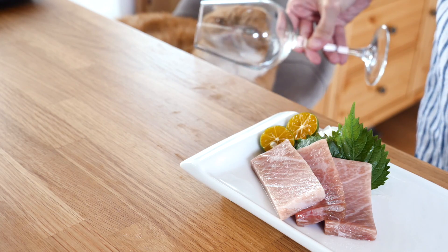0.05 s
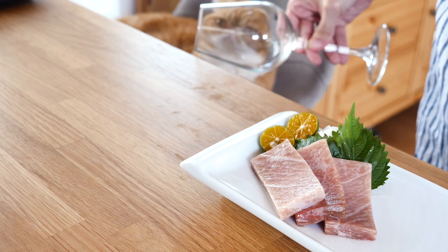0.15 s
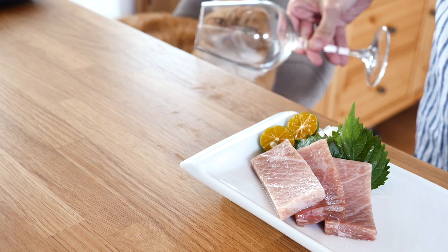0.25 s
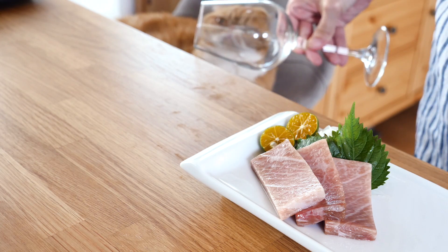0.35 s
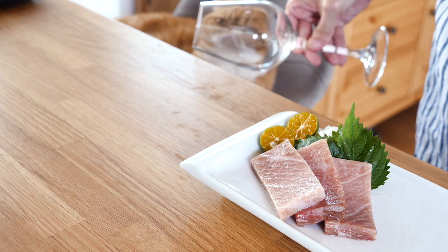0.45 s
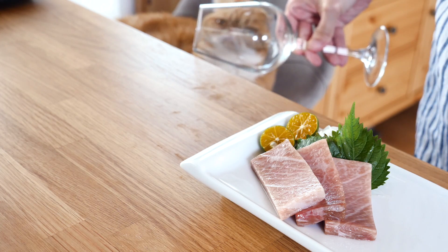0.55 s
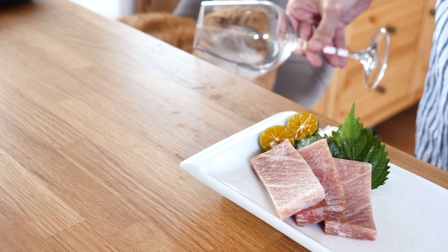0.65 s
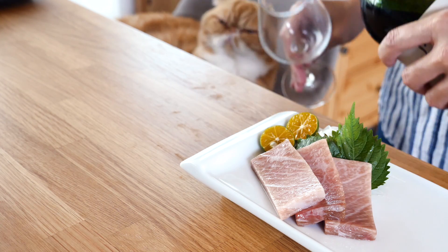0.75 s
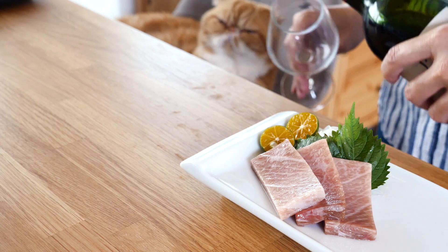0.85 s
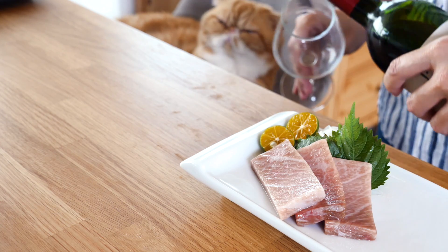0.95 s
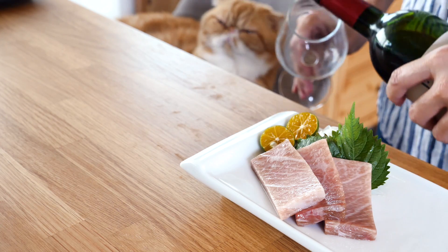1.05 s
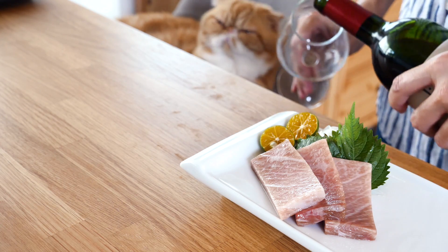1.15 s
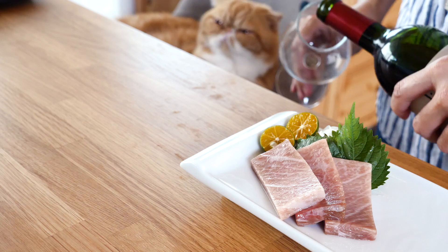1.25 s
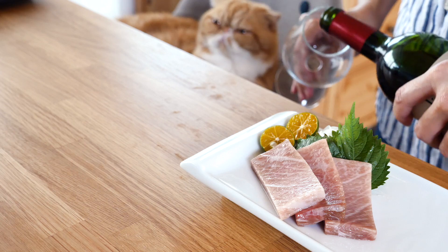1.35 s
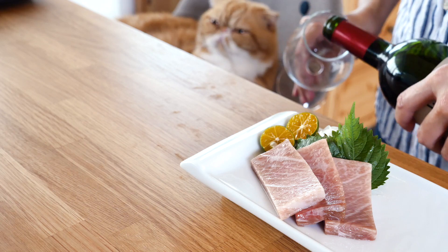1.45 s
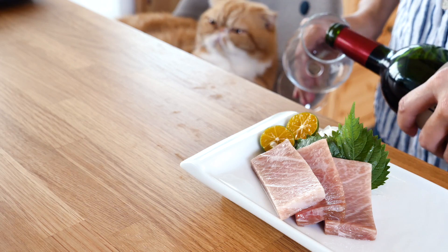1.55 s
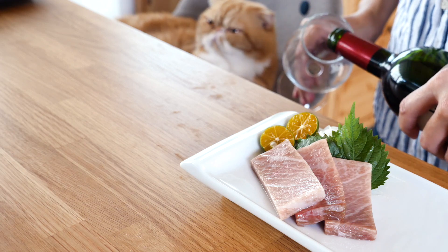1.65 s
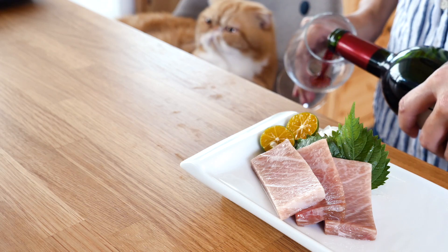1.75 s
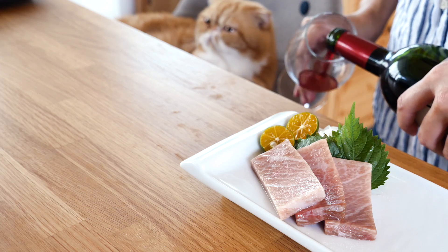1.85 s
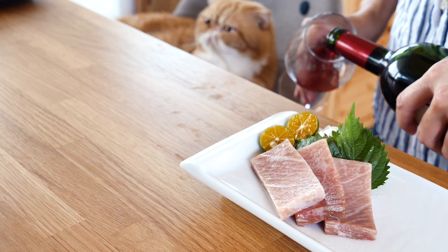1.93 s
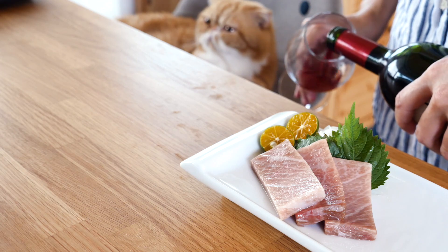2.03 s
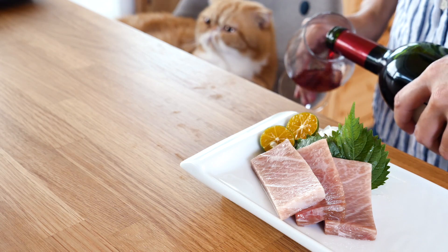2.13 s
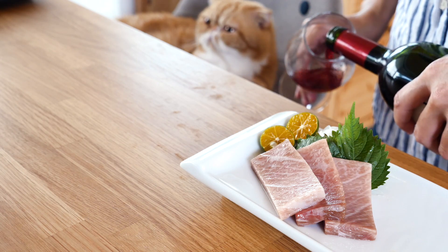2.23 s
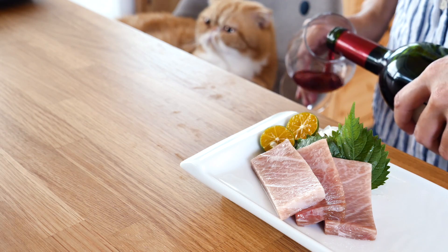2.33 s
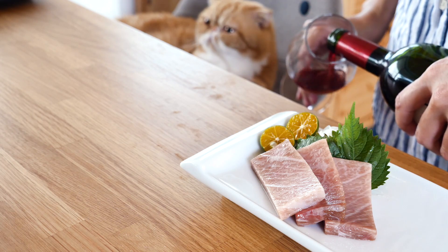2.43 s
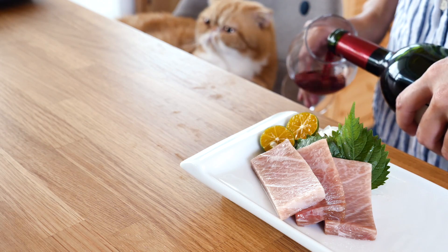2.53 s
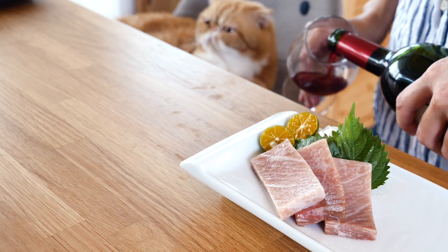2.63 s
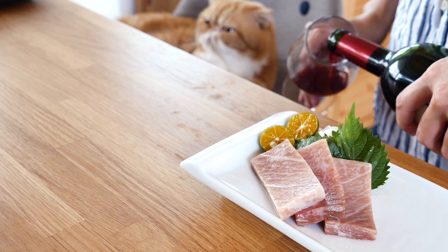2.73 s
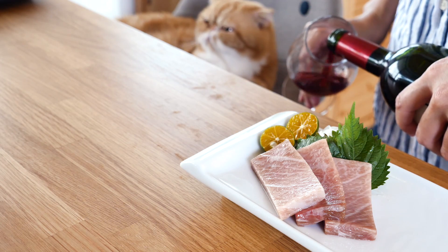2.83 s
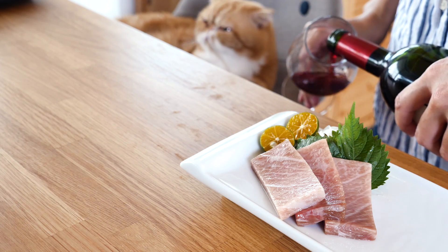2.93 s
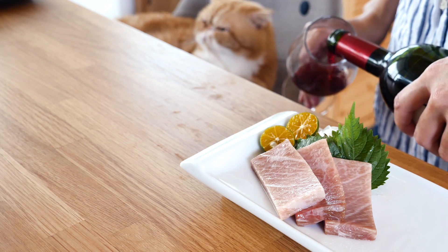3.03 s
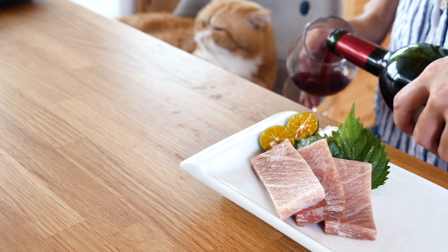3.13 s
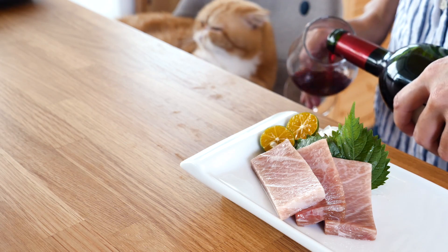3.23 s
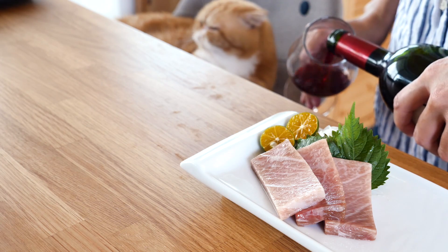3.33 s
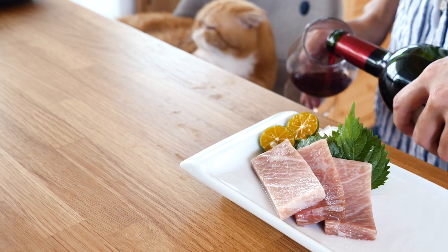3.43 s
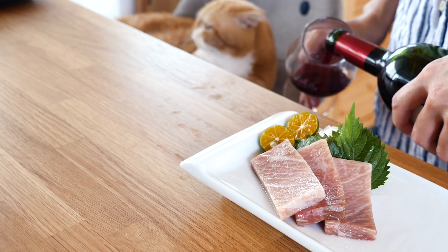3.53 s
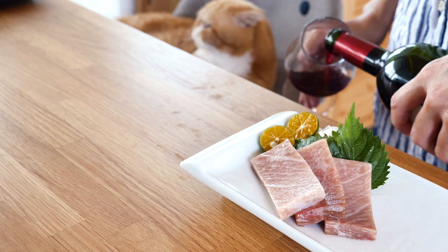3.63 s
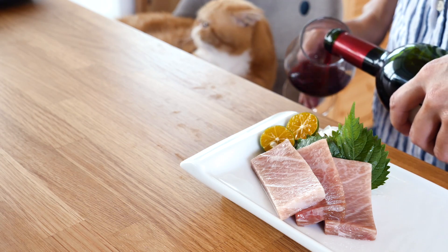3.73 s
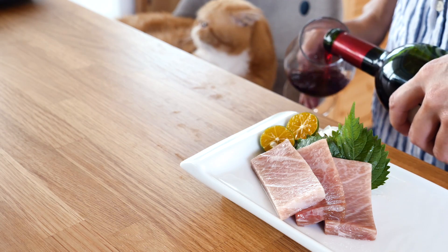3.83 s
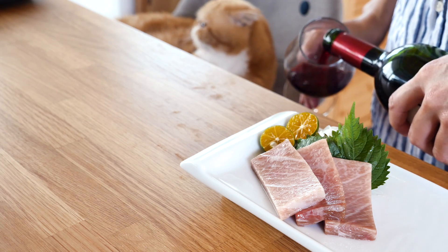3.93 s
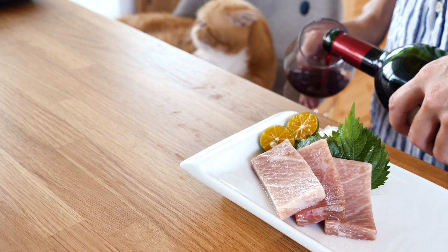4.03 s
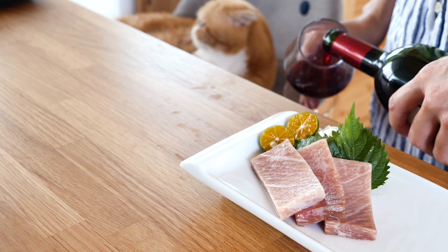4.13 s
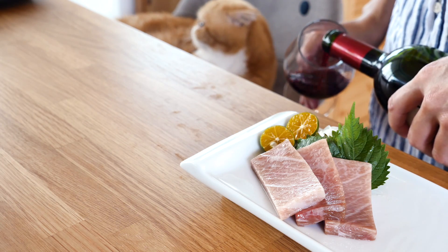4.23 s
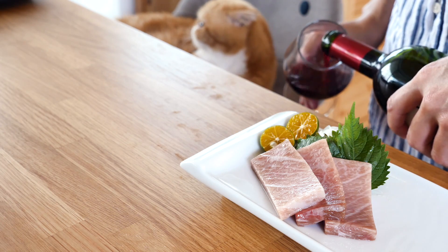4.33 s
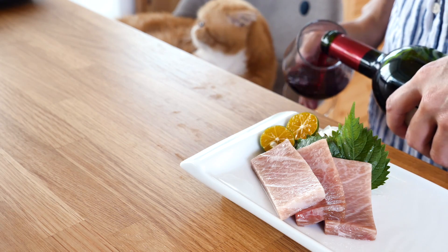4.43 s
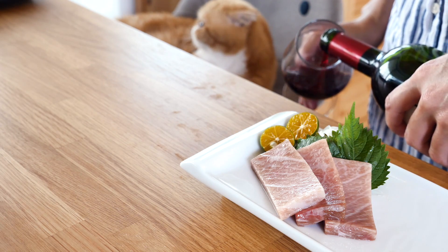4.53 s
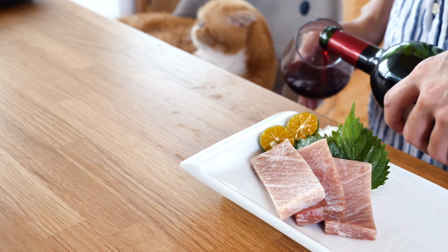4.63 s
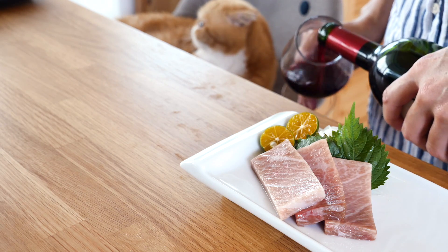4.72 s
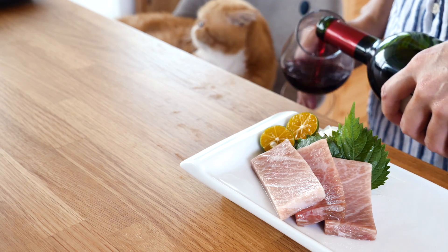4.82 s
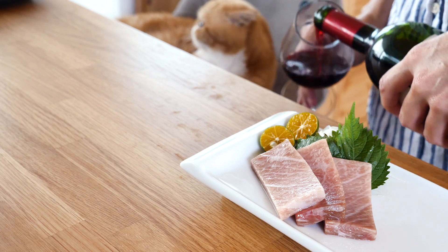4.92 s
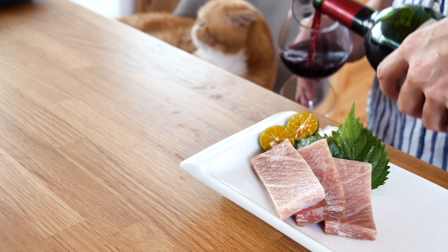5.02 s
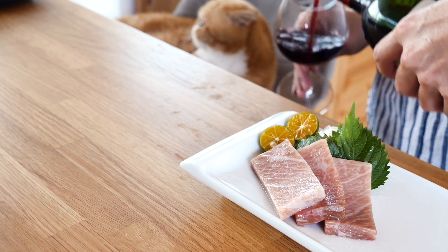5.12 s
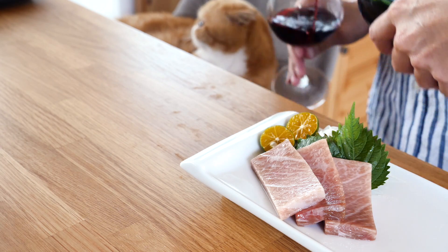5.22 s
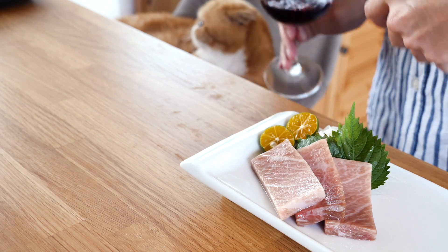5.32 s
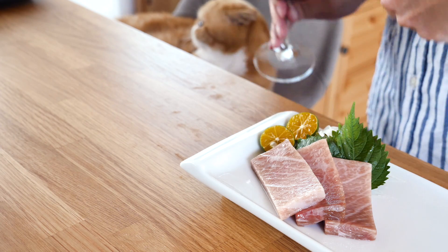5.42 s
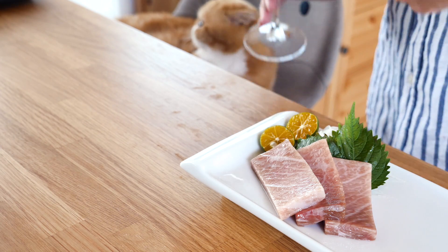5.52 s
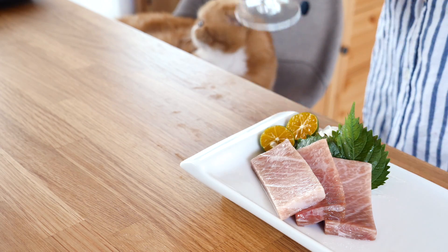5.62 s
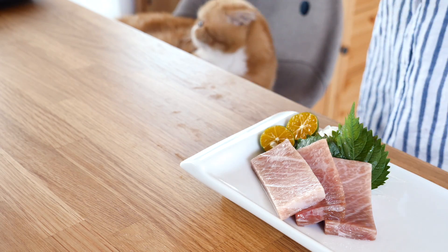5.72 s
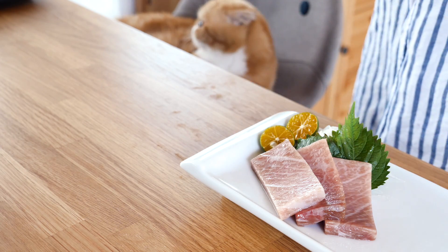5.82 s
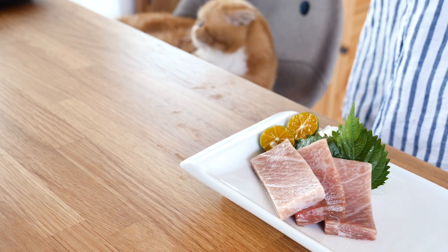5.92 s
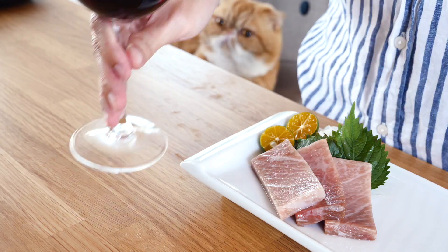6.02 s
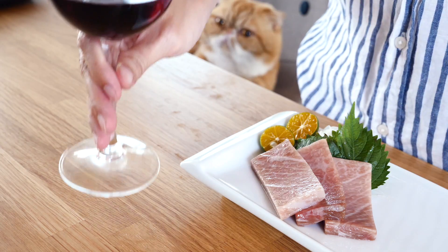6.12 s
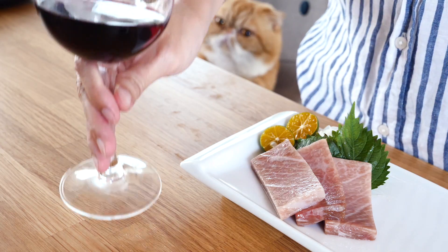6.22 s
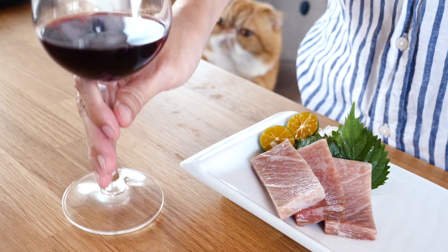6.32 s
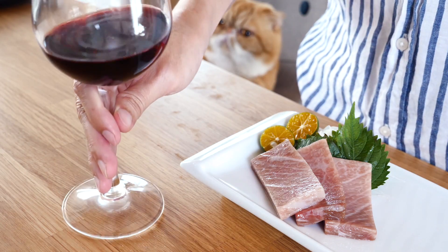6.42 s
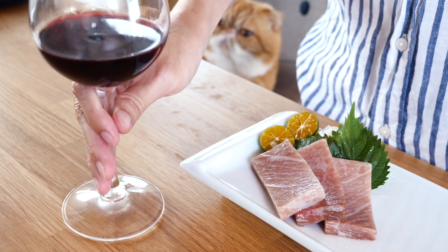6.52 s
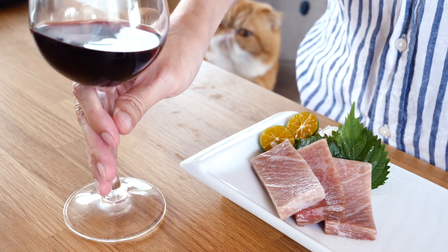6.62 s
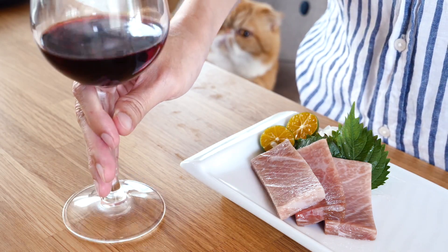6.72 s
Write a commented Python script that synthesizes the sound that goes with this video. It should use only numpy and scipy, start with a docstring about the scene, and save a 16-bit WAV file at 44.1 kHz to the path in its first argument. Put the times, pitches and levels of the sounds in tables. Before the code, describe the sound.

Low, smooth air noise runs throughout. After a quiet opening comes one clear, wavering glass clink, then a delicate sparse trickle of wine into the bowl, with ticking splashes and little rising bubble blips. The pour ends with a short hard tap, a louder bubble and low glugs. After a pause, the glass foot strikes wood, the loudest event, and rattles softly to rest. Close microphone, short dull reflections of a small room.

```python
"""Wine is poured in a thin stream into a hand-held glass: splashes are short noise snaps that ring the bowl,
bubbles are dying sines of climbing pitch, and stray droplets are faint short tones. Before the pour the bottle
neck clinks on the rim, and it taps again as it is lifted away; both are sums of dying modes and noise puffs.
Last, the glass is set on a wooden table where its foot rocks to rest, again as modes and noise.
A small quiet room adds dying noise echoes; shaped noise makes the steady rush of ventilation."""
import sys
import numpy as np
from scipy import signal
from scipy.fft import rfft, irfft
from scipy.io import wavfile

SR = 44100
rng = np.random.default_rng(int(sys.argv[2]) if len(sys.argv) > 2 else 0)


def to_wav(sig):
    """Store sig (one row per channel, or 1-D mono) as 16-bit WAV at the path in sys.argv[1].

    Samples outside -1..1 are clipped; the rate is SR.
    """
    pcm = np.clip(np.atleast_2d(sig), -1, 1) * 32767
    pcm = np.round(pcm).astype(np.int16)
    wavfile.write(sys.argv[1], SR, pcm.T)  # frames by channels


N = 298380   # length of the scene in samples
TIME = np.arange(SR // 2) / SR   # the half second, in s, that each single sound may last


def amp(db):
    """Turn decibels into a factor of amplitude."""
    return 10 ** (np.asarray(db) / 20)


def add(out, start_s, sound):
    """Mix a sound in from its start time."""
    at = round(start_s * SR)
    out[at:at + len(sound)] += sound[:N - at]


def fade(t60_s):
    """An even dying away: 60 dB down after t60_s, which is never under 4 ms."""
    return amp(-60 * TIME / max(t60_s, .004))


def swell(rise_s):
    """The moment that a contact lasts: a smooth rise to 1."""
    return 1 - np.exp(-(TIME / rise_s) ** 2)


def tone(pitch_hz, t60_s):
    """A struck mode: a dying sine of height 1."""
    return fade(t60_s) * np.sin(2 * np.pi * pitch_hz * TIME)


def burst(low_hz, high_hz, t60_s):
    """A dying puff of band noise, starting at rms 1."""
    band = signal.butter(2, [low_hz, min(high_hz, .45 * SR)], "band", fs=SR, output="sos")
    noise = signal.sosfilt(band, rng.standard_normal(len(TIME)))
    return fade(t60_s) * noise / noise.std()


def splashes():
    """Each splash snaps in its own band, rings the nearby modes of the filled bowl and throws droplets."""
    # clear splashes on the wall of the glass: start_s, level_db, centre_hz
    clear = [(2.2518, -37.5, 6460), (2.2522, -47, 13400), (2.8416, -58, 11100), (3.2353, -58, 13700),
             (3.2705, -49, 5370), (3.282, -53, 13500), (3.437, -43.5, 4600), (3.5341, -47, 5030),
             (3.5345, -48, 13500), (3.5785, -61, 13000), (3.8419, -55, 8300), (3.9387, -45, 10800),
             (4, -48, 9300), (4.0469, -58, 13000), (4.067, -44, 12700), (4.1068, -58, 10900),
             (4.3213, -45.5, 9900), (4.336, -47, 9700), (4.355, -55, 10000), (4.4006, -55, 7700),
             (4.5413, -55, 9900), (4.5872, -52, 13200), (4.6026, -47, 11400), (4.6241, -49, 12600),
             (4.648, -50.5, 8050), (4.881, -58, 11500), (4.9099, -44, 5560), (4.9414, -47, 6540),
             (4.9638, -59, 10500), (4.9723, -44.5, 6940), (4.9868, -53, 11500), (5.0347, -54, 9150),
             (5.0721, -47.5, 13100), (5.1775, -35, 7300), (5.2153, -40.5, 7300), (5.2452, -49, 9600),
             (5.2756, -38.5, 6880), (5.2856, -49, 9200), (5.3105, -38, 8040), (5.34, -54, 12400),
             (5.365, -54, 11900)]
    # the filled bowl, damped by wine and hand: pitch_hz, level_db, t60_s
    filled_bowl = [(5329, 3.5, .2), (6200, -13, .06), (7140, 5.5, 0.1), (8231, -2, .08), (9600, -6, .08),
                   (9800, 7, 0.11), (11000, -12, .06), (11913, -3, 0.088), (12478, -3, .06),
                   (12796, 5, 0.05), (14000, 2, .04), (14600, -3, .04), (15267, 2, .04)]
    snap_width_hz, snap_t60_s, skirt_db, ring_db = 1700, .015, -16, -4
    spray_mean_delay_s, spray_db = .02, -10.5
    # faint splashes fall anywhere between these corners: start_s, level_db, centre_hz
    low, high = np.array([2.6, -60, 8350]), np.array([5.85, -57.5, 14500])
    faint = low + (high - low) * rng.random((14, 3))

    out = np.zeros(N)
    modes_hz = np.array([pitch_hz for pitch_hz, mode_db, t60_s in filled_bowl])
    bins_hz = np.fft.rfftfreq(len(TIME), 1 / SR)
    treble_skirt = amp(skirt_db) / (1 + (5000 / (bins_hz + 1)) ** 4)
    snap_fade = fade(snap_t60_s) + amp(-17.5) * fade(.074)   # a quick drop with a faint longer tail
    for start_s, level_db, centre_hz in [*clear, *faint]:
        # modes near the band of the splash ring most, each by an uneven amount
        closeness = np.exp(-.5 * ((modes_hz - centre_hz) / snap_width_hz) ** 2)
        mode_shares = closeness * amp(rng.normal(-11, 3, len(filled_bowl)))
        slosh = 1 + rng.normal(0, .012)   # the moving wine detunes the bowl a little
        modes = np.array([amp(mode_db) * tone(pitch_hz * slosh, t60_s)
                          for pitch_hz, mode_db, t60_s in filled_bowl])
        ring = amp(ring_db) * mode_shares @ modes

        snap_band = np.exp(-.5 * ((bins_hz - centre_hz) / snap_width_hz) ** 2) + treble_skirt
        snap = irfft(rfft(rng.standard_normal(len(TIME))) * snap_band)
        snap = amp(3.5) * snap_fade * snap / snap.std()
        add(out, start_s, amp(level_db) * swell(.00048) * (snap + ring))

        for wait, pitch, size in rng.random((9, 3)):
            delay_s = -spray_mean_delay_s * np.log(wait)
            droplet_hz = np.clip(centre_hz + 3.5 * snap_width_hz * (pitch - .5), 3000, 15500)
            droplet_db = level_db + spray_db + 8.8 * size - 60 * delay_s   # later droplets are fainter
            droplet = swell(.0015) * tone(droplet_hz, 250 / droplet_hz)   # 60 dB down after 250 cycles
            add(out, start_s + delay_s, amp(droplet_db) * droplet)
    return out


def bubbles(rows, swell_cycles=1.7, rise=.0032):
    """A trapped bubble swells over a few cycles and rings, its pitch climbing as it nears the surface."""
    out = np.zeros(N)
    for start_s, level_db, pitch_hz, t60_s in rows:
        cycles = pitch_hz * TIME
        growth = 1 - np.exp(-cycles / swell_cycles)
        wave = np.sin(2 * np.pi * cycles * (1 + rise * np.sqrt(cycles)))
        add(out, start_s, amp(level_db) * growth * fade(t60_s) * wave)
    return out


def stream_bubbles():
    """Bubbles under the stream and at the neck: the louder a bubble, the sooner it dies."""
    # one row a bubble: start_s, level_db, starting pitch_hz
    stream_rows = [(2.19, -28, 1600), (2.2518, -30, 3950), (3.2212, -35.5, 2380), (3.2714, -27.5, 3820),
                   (3.4377, -31, 1640), (3.4816, -34.5, 2870), (3.6088, -34.5, 1530), (3.8143, -38, 2990),
                   (3.9096, -39, 2930), (4.1516, -39, 2890), (4.6646, -39, 3030), (4.8116, -39, 3130),
                   (4.8795, -38, 3120), (4.9093, -34, 4620), (4.9627, -37, 2300), (5.151, -32, 2970),
                   (5.1793, -12.5, 2980), (5.29, -25, 2955)]
    loudest_t60_s, doubling_db = .029, 28   # the ring time doubles for a bubble this much fainter
    top_db = max(level_db for start_s, level_db, pitch_hz in stream_rows)
    return bubbles([(start_s, level_db, pitch_hz, loudest_t60_s * 2 ** ((top_db - level_db) / doubling_db))
                    for start_s, level_db, pitch_hz in stream_rows])


def glugs():
    """Glugs of air into the bottle: low bubbles that swell in fewer cycles, though more slowly, and climb more."""
    # one row a glug: start_s, level_db, starting pitch_hz
    glug_rows = [(5.226, -26, 605), (5.292, -30, 610), (5.321, -20, 626), (5.326, -28, 784)]
    glug_t60_s = .049
    return bubbles([(*row, glug_t60_s) for row in glug_rows], swell_cycles=1.0, rise=.011)


def pings():
    """Drops that strike the glass squarely each sound one clear mode of steady pitch."""
    # one row a drop: start_s, level_db, pitch_hz, t60_s
    ping_rows = [(3.2712, -28.5, 5000, 0.03), (3.4817, -53, 10200, 0.1), (3.5361, -42, 5300, 0.081),
                 (3.9995, -52, 7150, 0.17), (3.912, -58, 5300, .2), (4.9099, -57, 5330, 0.27),
                 (4.9638, -61, 9700, 0.33)]
    return bubbles(ping_rows, rise=0)


def trickle():
    """Faint stray droplets of the stream, at random moments and pitches, of uneven size."""
    start_s, end_s, faintest_db = 2.7, 6, -64
    out = np.zeros(N)
    for when, pitch, size in rng.random((90, 3)):
        pitch_hz = 4500 * 3.3 ** pitch
        droplet = swell(.0011) * tone(pitch_hz, 300 / pitch_hz)   # 60 dB down after 300 cycles
        add(out, start_s + when * (end_s - start_s), amp(faintest_db + 11 * size) * droplet)
    return out


def clink():
    """Rim modes come as close twins that beat: opposed twins start quiet and swell, the others throb."""
    # empty bowl and bottle neck: pitch_hz, level_db, t60_s, how far the twin lies below (split_hz),
    # twin share (times the mode's height; negative = opposite phase)
    empty_bowl = [(1214.5, -5, .52, 3.7, -1), (2460, -2.5, .43, 4.2, .44), (2620, -2.5, .38, 6.3, .55),
                  (3189.2, 2, .45, 4.6, -.8), (3180.4, -2, .8, -17.9, .45), (3820, -13, .33, 6.3, .4),
                  (4774, -14, .33, 4.3, .4), (5451, -17.5, .45, 6.2, .55), (7382, -17, .38, 6, .45),
                  (8282, -15.5, .28, 9, .5), (9688, -13, .2, 20, .6), (555, -3.5, .12, 30, .3),
                  (1900, -7, .04, 150, .6), (2150, -5, .03, 120, .6), (3237, -13, .12, 39, .4),
                  (3500, -9, .04, 150, .7), (3973, -18, .15, 20, .3), (5033, -26, .25, 20, .3),
                  (7192, -19, .13, 20, .3), (7757, -28, .25, 20, .3), (9878, -23, .2, 20, .3),
                  (11010, -32, .3, 20, .3), (12810, -27, .2, 20, .3), (13970, -38, .3, 20, .3),
                  (14700, -34, .14, 20, .3)]
    start_s, ring_db, crack_db = 1.7172, -20, -15
    rings = sum(amp(level_db) * (tone(pitch_hz, t60_s) + share * tone(pitch_hz - split_hz, t60_s))
                for pitch_hz, level_db, t60_s, split_hz, share in empty_bowl)
    tail_fade = np.clip((TIME[-1] - TIME) / .05, 0, 1)   # the last 50 ms go smoothly to silence
    out = np.zeros(N)
    add(out, start_s, amp(ring_db) * swell(.00062) * rings * tail_fade)
    add(out, start_s, amp(crack_db) * swell(.00047) * burst(1680, 3600, .061))
    add(out, start_s, amp(crack_db - 25) * burst(6800, 15500, .082))
    add(out, start_s, amp(crack_db - 17.5) * burst(3200, 4500, .65))   # dense faint modes of the bottle
    return out


def neck_tap():
    """The neck taps the rim as it is lifted away: a few short modes and a puff of noise."""
    # struck modes: pitch_hz, level_db, t60_s
    neck_modes = [(2880, -2.5, 0.095), (3490, -6, 0.072), (3740, -2.5, 0.028), (4180, -17, 0.063),
                  (4580, -29, 0.11)]
    start_s, tap_db = 5.2053, -17
    rings = sum(amp(level_db) * tone(pitch_hz, t60_s) for pitch_hz, level_db, t60_s in neck_modes)
    out = np.zeros(N)
    add(out, start_s, amp(tap_db) * swell(.00033) * rings)
    add(out, start_s, amp(tap_db - 20.5) * burst(3000, 3870, .33))   # faint modes of the bottle
    return out


def set_down():
    """Each landing thumps the table; the contacts grow softer, so the foot rings less, down to a floor."""
    # the foot lands and rocks to rest: start_s, level_db
    landings = [(6.4388, -3.5), (6.4790, -8), (6.5017, -13), (6.515, -13), (6.527, -19), (6.558, -24),
                (6.580, -22), (6.603, -26), (6.624, -28)]
    # low modes of the table top: pitch_hz, level_db, t60_s
    table_modes = [(95, -32, .2), (150, -22, .08), (245, -13, .07), (580, -10, .07), (661, -5.5, .062),
                   (725, -11.5, .07), (991, -17, .04), (1339, -21, .05), (1860, -20, .06), (2080, -16, .07),
                   (2188, -12, .04), (2280, -13, .045), (2352, -15, .04)]
    # high modes of the glass foot and stem: pitch_hz, level_db, t60_s
    foot_modes = [(4630, -32, .75), (5156, -25.5, .3), (7752, -29, .14), (8370, 1.5, .011),
                  (3500, -18, .02), (5740, -11, .02), (10000, -24, .015), (11700, -28, .02),
                  (12700, -24, .03)]
    first_foot_db, loss_per_landing_db, softest_foot_db = -6.5, 6.5, -28
    out = np.zeros(N)
    for count, (start_s, landing_db) in enumerate(landings):
        foot_db = max(first_foot_db - loss_per_landing_db * count, softest_foot_db)
        # neighbouring modes of the board start opposed, so the thump blooms after the tick
        wood = sum((-1) ** k * amp(level_db + rng.normal(0, 1.8)) * tone(pitch_hz, t60_s)
                   for k, (pitch_hz, level_db, t60_s) in enumerate(table_modes))
        # the many faint modes of the wood
        wood += amp(-12.5) * burst(190, 2200, .023) + amp(-16.5) * burst(500, 840, .06)
        glass = sum(amp(level_db) * tone(pitch_hz, t60_s) for pitch_hz, level_db, t60_s in foot_modes)
        glass += amp(-3.5) * burst(1000, 6500, .013)
        add(out, start_s, amp(landing_db) * (swell(.002) * wood + amp(foot_db) * swell(.0006) * glass))
    return out


def room(sound):
    """Dense dying echoes from 3 ms on, dulled by the walls."""
    echo_t60_s, echo_db, wall_hz = .4, -13.5, 4860
    echoes = fade(echo_t60_s) * rng.standard_normal(len(TIME)) * (TIME > .003)
    echoes = signal.sosfilt(signal.butter(2, wall_hz, fs=SR, output="sos"), echoes)
    return amp(echo_db) * signal.fftconvolve(sound, echoes / np.linalg.norm(echoes))[:N]


def rush():
    """Steady smooth noise of moving air from the ventilation, shaped along a curve over pitch."""
    # points of the curve: pitch_hz, level_db (relative, per Hz)
    curve = [(12, -68), (20, -26), (32, -33), (60, -10), (91, -11), (155, -2), (265, -1.5), (549, -12),
             (597, -13.5), (1270, -12), (3040, -24), (3700, -21), (5330, -35.5), (15100, -59.5),
             (16400, -60)]
    rush_rms_db = -38
    curve_hz, curve_db = np.transpose(curve)
    bins_hz = np.fft.rfftfreq(N, 1 / SR) + 1   # 1 Hz up, as zero has no logarithm
    shape = amp(np.interp(np.log(bins_hz), np.log(curve_hz), curve_db))
    noise = irfft(rfft(rng.standard_normal(N)) * shape, N)
    return amp(rush_rms_db) * noise / noise.std()


def microphone_hiss():
    """The microphone's own hiss: even noise at -68 dB rms."""
    return amp(-68) * rng.standard_normal(N)


def scene():
    """Wine, glass and table close by, with their room, over the rush of air."""
    near = splashes() + stream_bubbles() + glugs() + pings() + trickle() + set_down()
    rim = clink() + neck_tap()
    wet = room(near + amp(-8) * rim)   # clink and tap send 8 dB less to the room, so their rings stay clear
    return (near + rim + wet + rush() + microphone_hiss())[None]


def record(dry):
    """The top is cut: a steep low-pass filter is 70 dB down from 16500 Hz up."""
    return signal.sosfilt(signal.cheby2(18, 70, 16500, fs=SR, output="sos"), dry)


dry = scene()
out = record(dry)
to_wav(out)
```